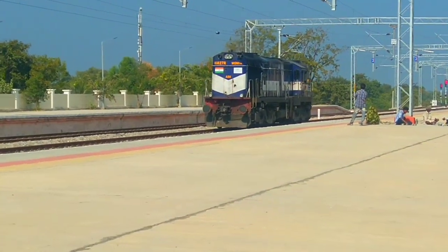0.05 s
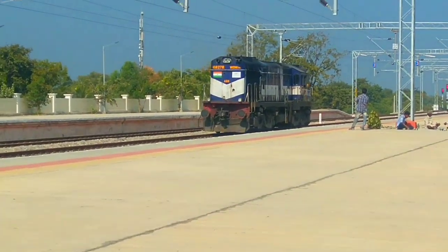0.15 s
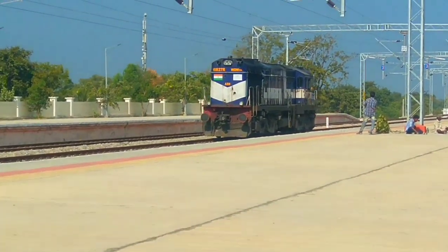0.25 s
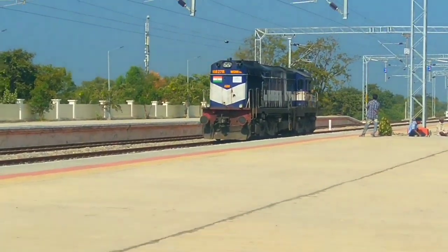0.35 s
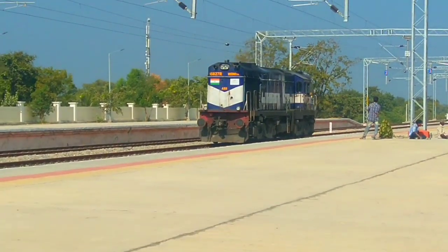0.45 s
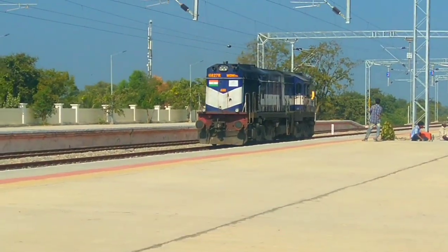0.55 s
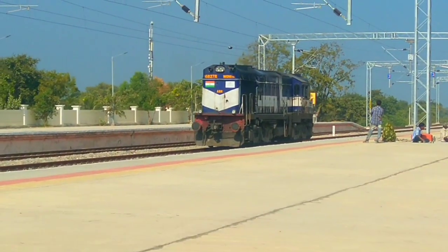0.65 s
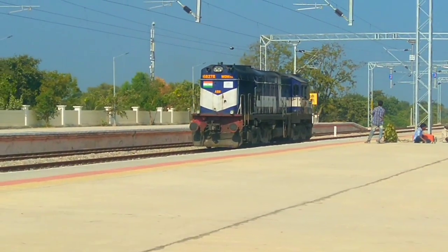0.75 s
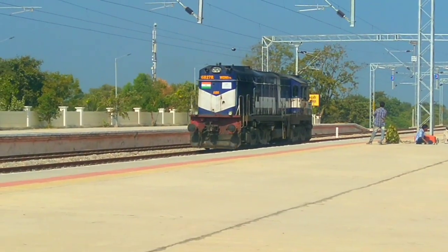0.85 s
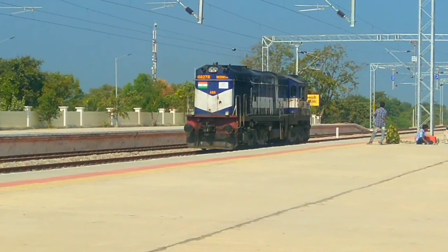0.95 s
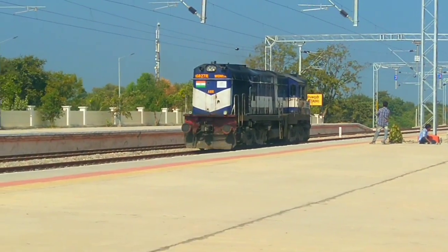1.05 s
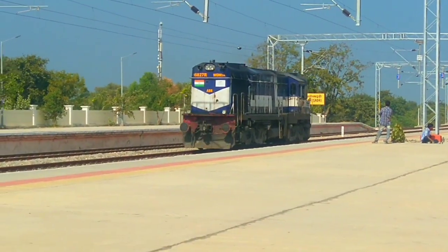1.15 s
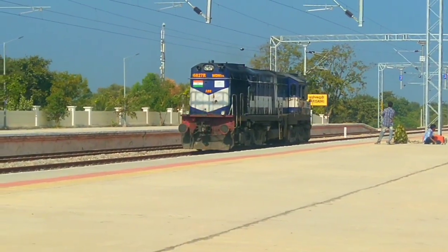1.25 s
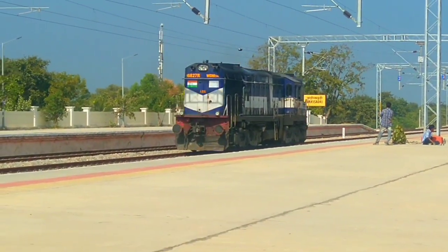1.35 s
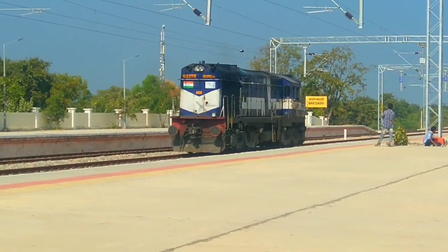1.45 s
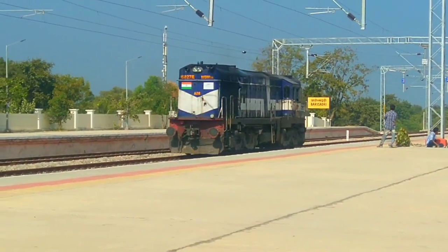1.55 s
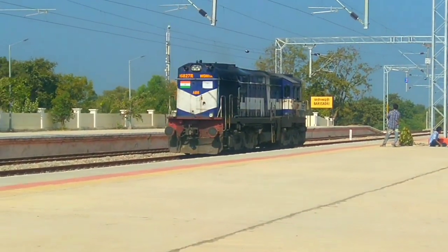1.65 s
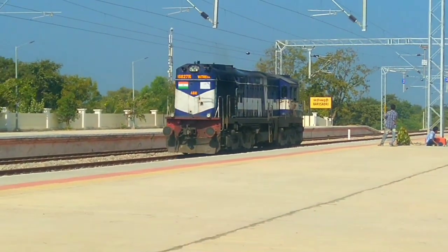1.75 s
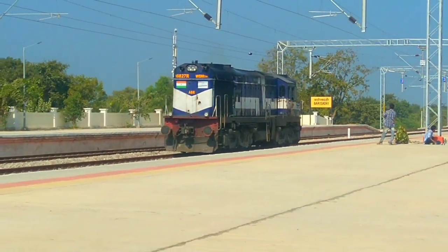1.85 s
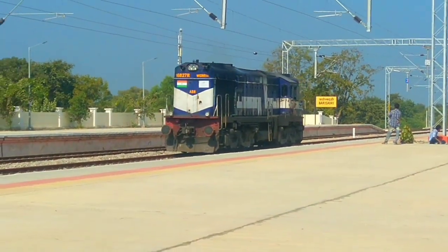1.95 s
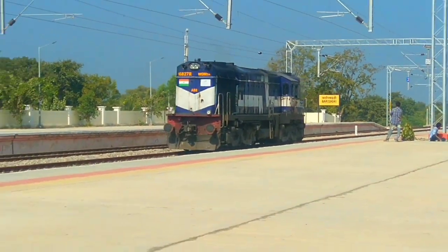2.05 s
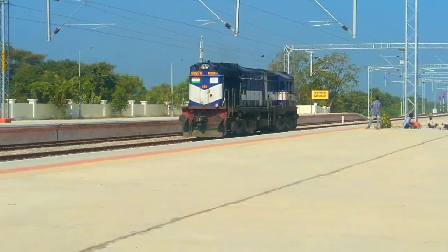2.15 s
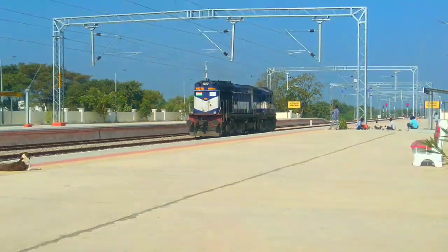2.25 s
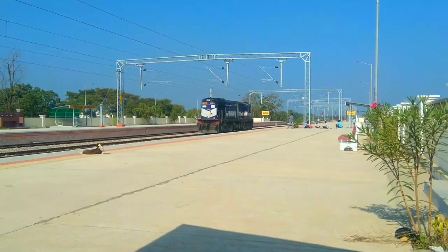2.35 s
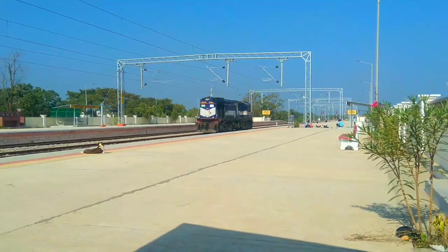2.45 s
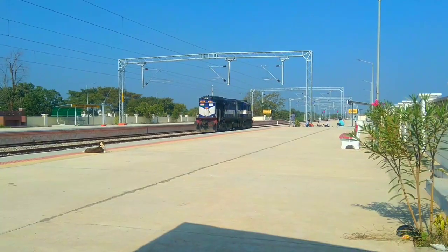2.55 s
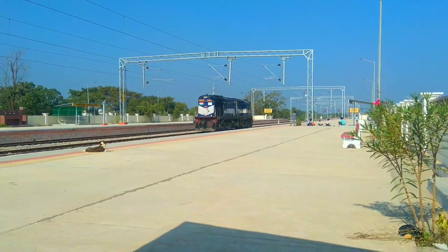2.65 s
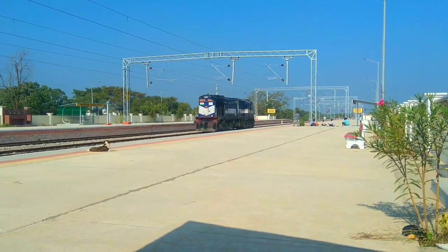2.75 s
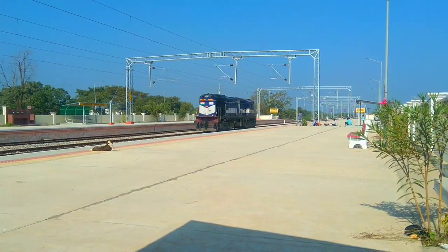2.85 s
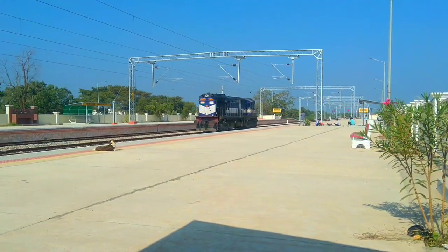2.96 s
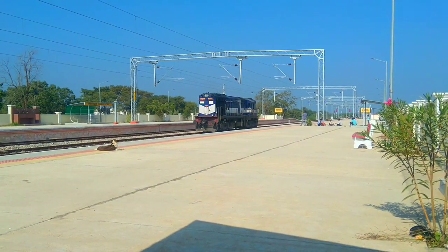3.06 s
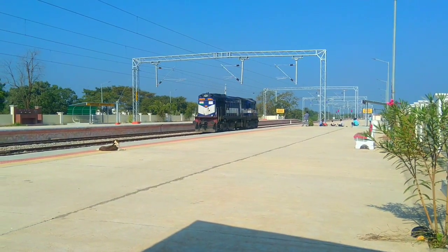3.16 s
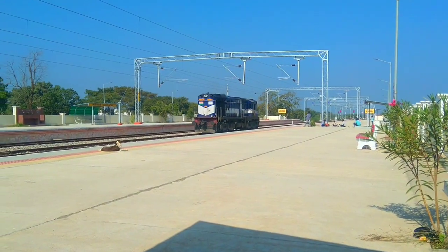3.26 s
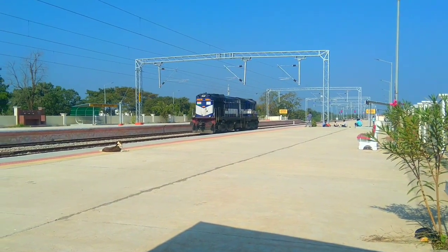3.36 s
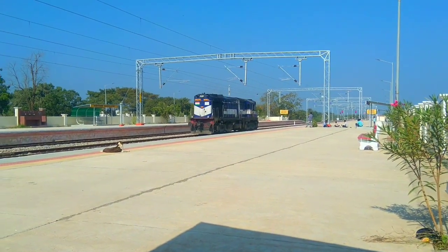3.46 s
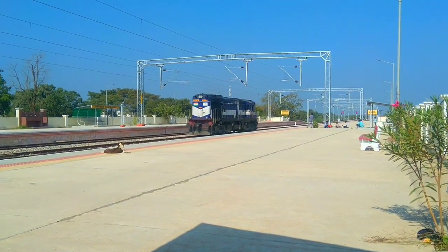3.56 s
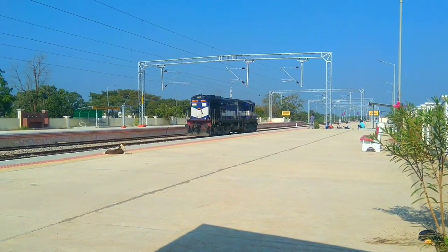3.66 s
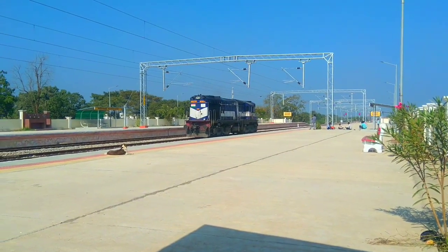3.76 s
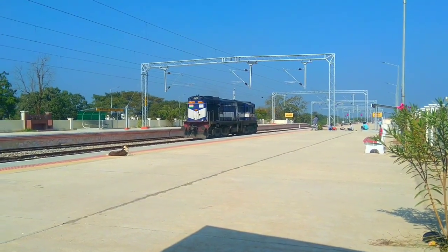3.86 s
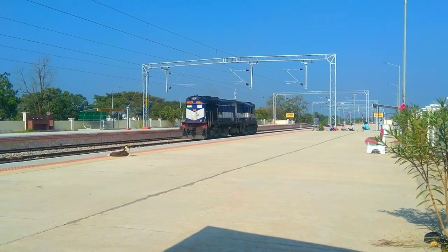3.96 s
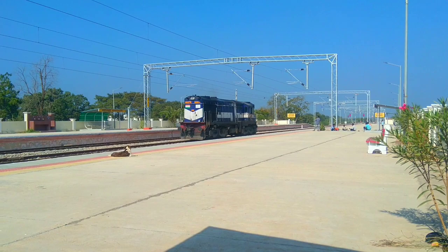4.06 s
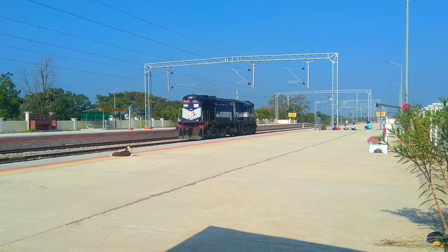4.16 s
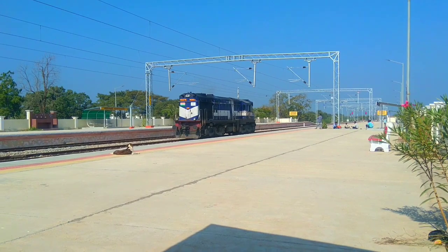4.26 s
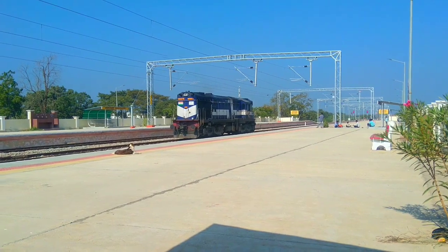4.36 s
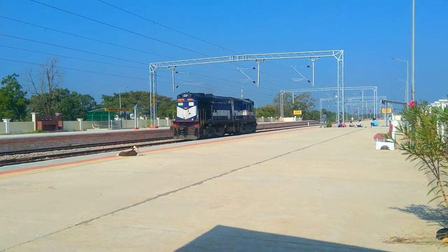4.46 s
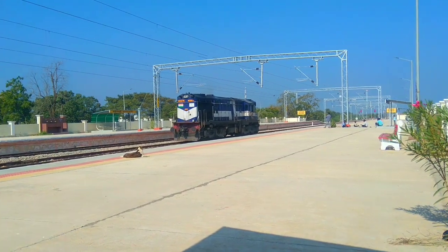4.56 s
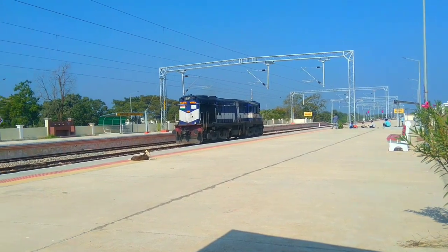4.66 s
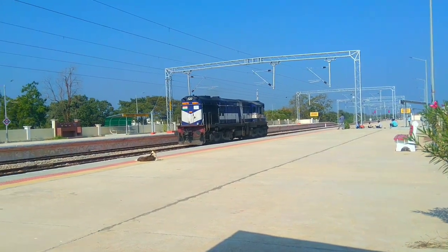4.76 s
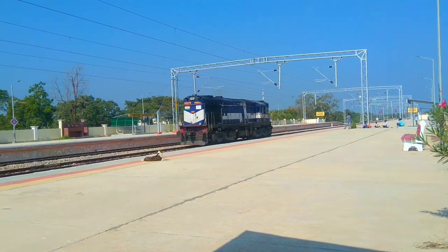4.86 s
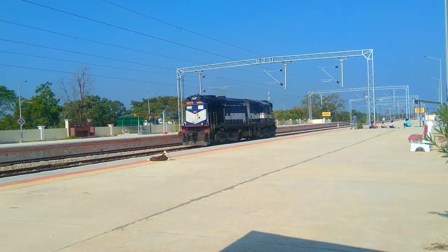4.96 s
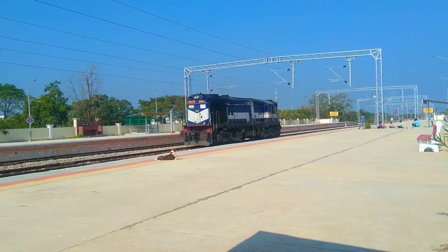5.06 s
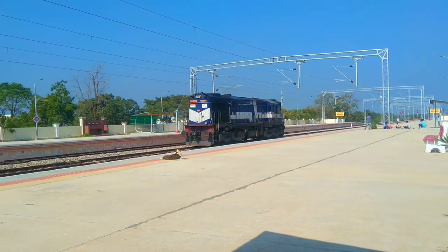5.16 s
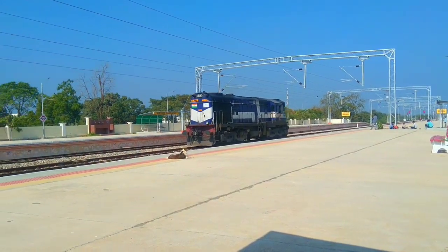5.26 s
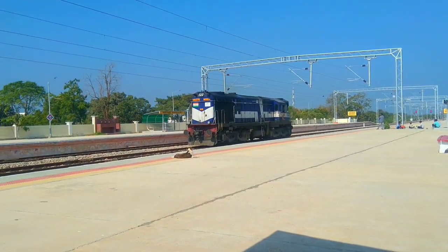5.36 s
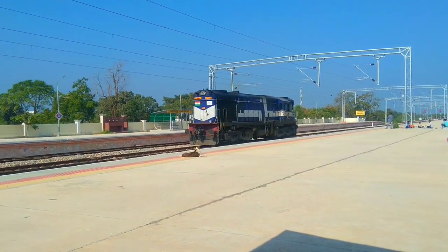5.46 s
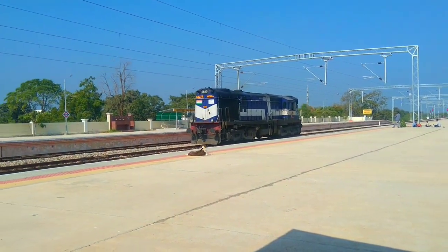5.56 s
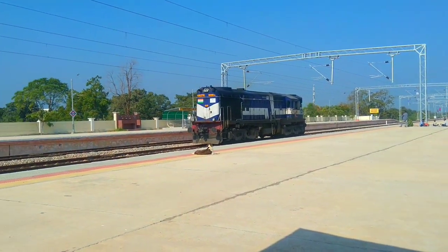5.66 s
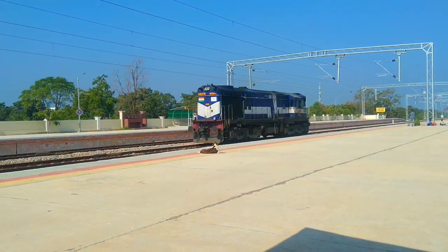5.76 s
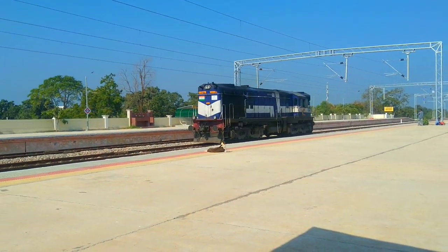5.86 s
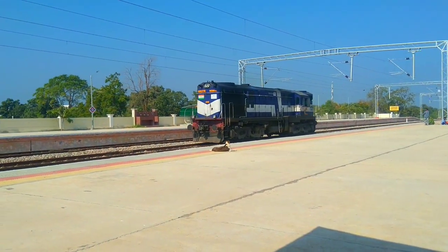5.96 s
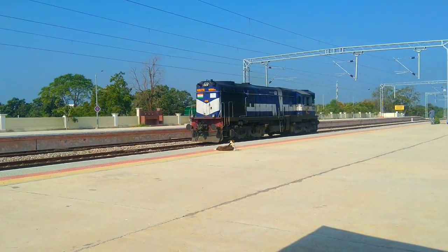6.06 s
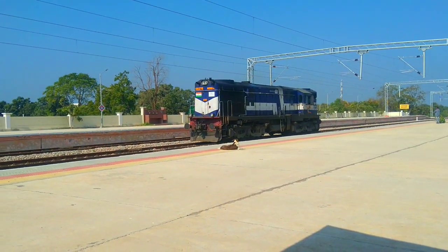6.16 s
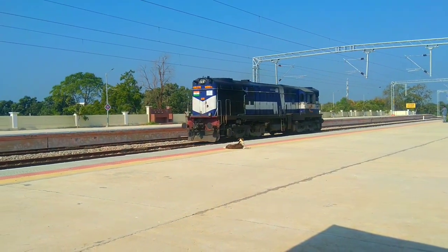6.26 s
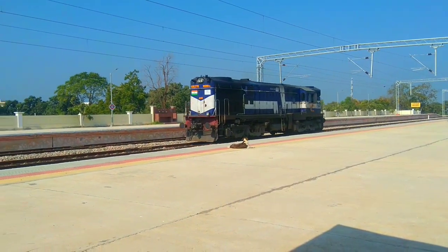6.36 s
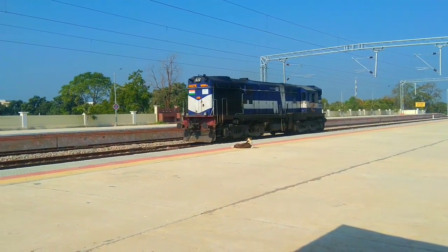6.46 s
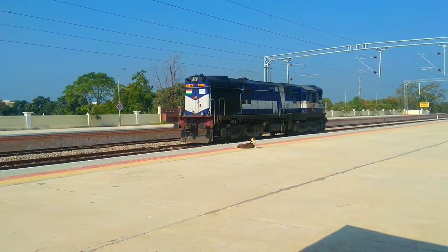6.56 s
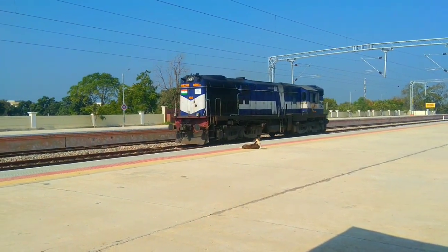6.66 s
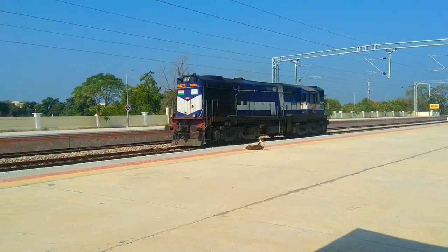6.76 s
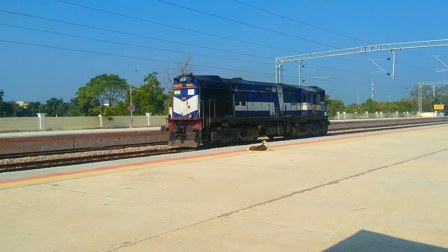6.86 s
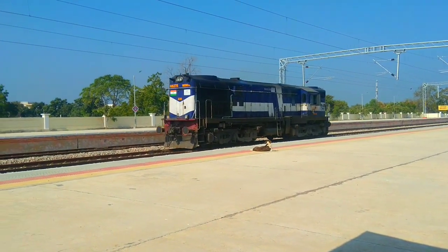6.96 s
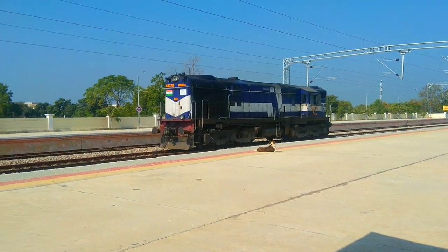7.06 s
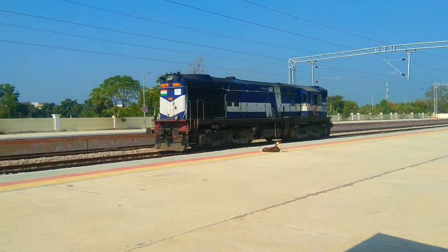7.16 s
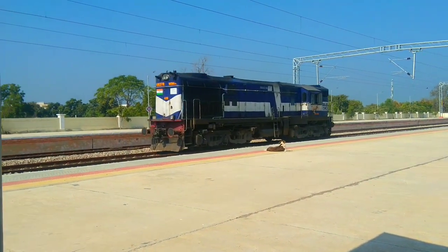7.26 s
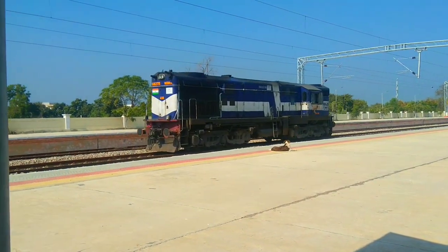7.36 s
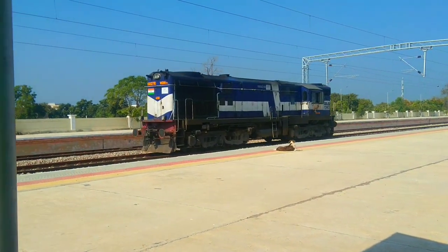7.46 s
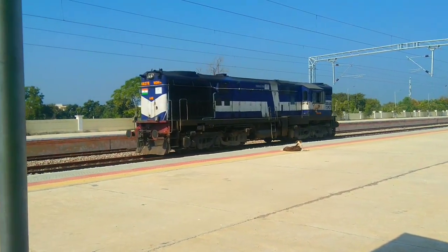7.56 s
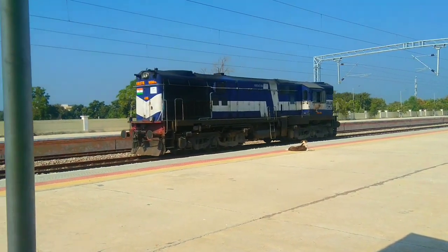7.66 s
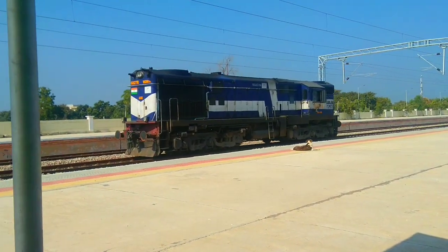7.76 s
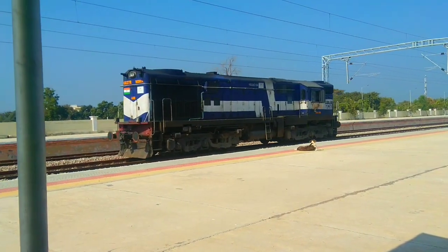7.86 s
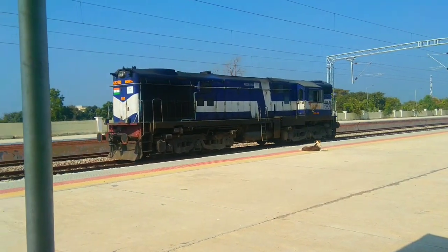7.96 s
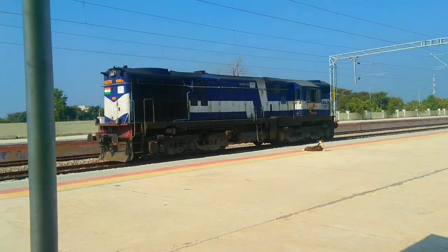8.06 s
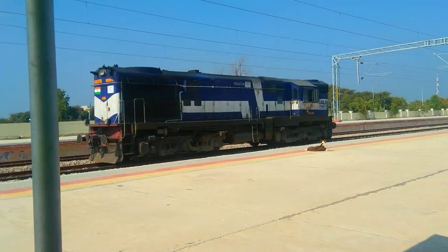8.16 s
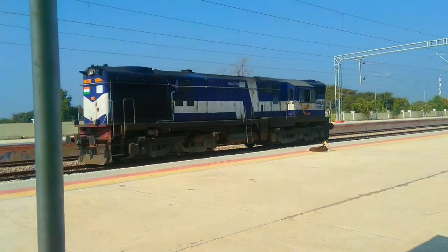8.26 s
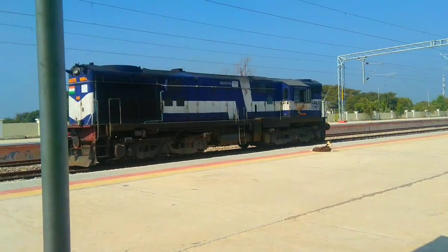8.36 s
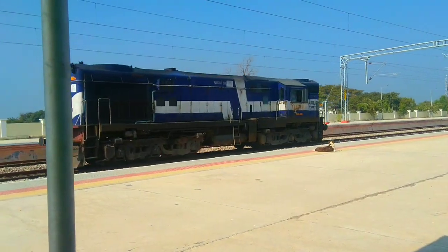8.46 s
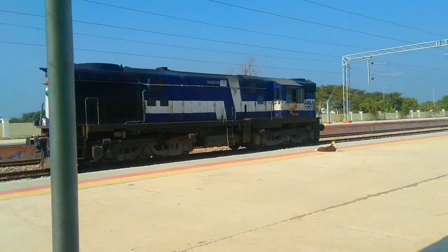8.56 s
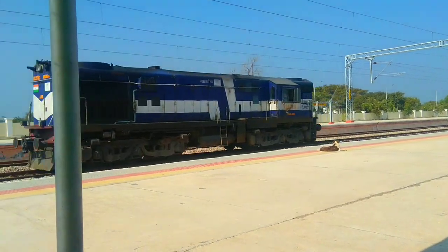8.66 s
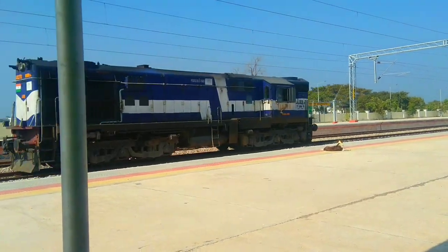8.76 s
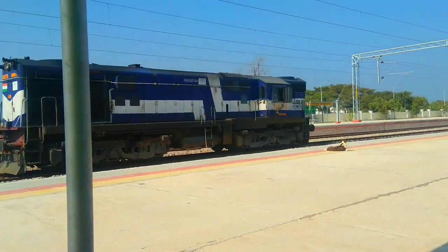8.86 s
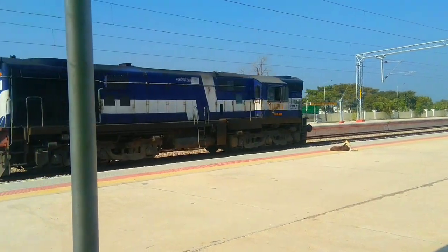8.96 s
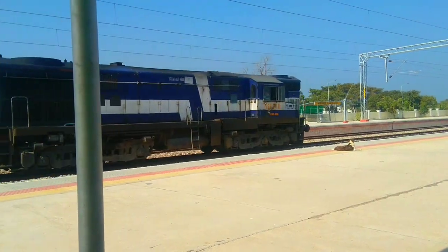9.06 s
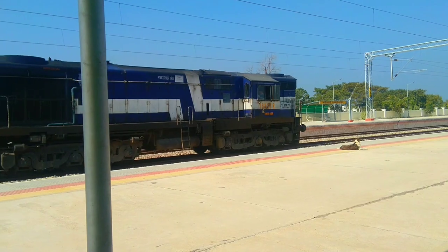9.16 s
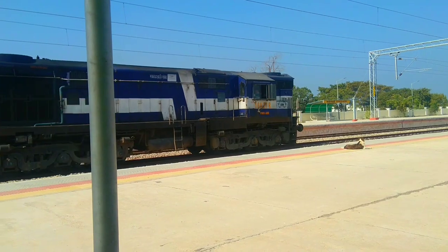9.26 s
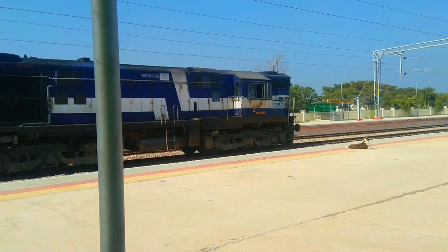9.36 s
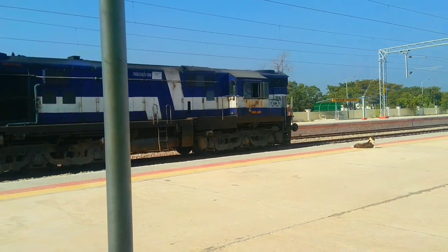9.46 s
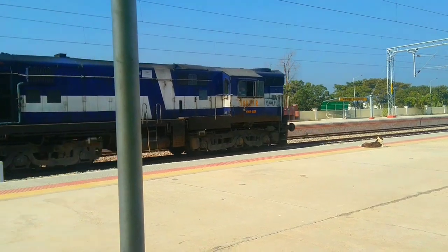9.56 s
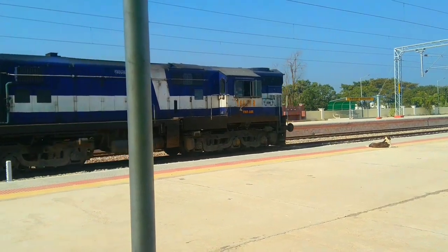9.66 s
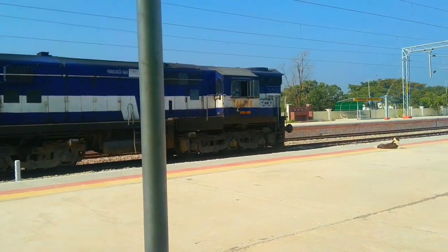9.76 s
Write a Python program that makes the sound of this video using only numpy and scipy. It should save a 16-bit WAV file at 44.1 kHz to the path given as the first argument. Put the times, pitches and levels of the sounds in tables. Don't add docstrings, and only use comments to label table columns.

```python
import sys
import numpy as np
from scipy import signal
from scipy.fft import rfft, irfft
from scipy.io import wavfile
from scipy.ndimage import uniform_filter1d

SR = 44100
rng = np.random.default_rng(int(sys.argv[2]) if len(sys.argv) > 2 else 0)


def wrap_up_sound(samples):
    columns = np.atleast_2d(samples).T
    tamed = np.clip(columns, -1, 1)
    steps = np.round(tamed * 32767).astype(np.int16)
    wavfile.write(sys.argv[1], SR, steps)


def volts_from_db(level):
    exponent = np.asarray(level, float) / 20
    return 10 ** exponent


N = 433062
TIME = np.arange(N) / SR
HZ = np.fft.rfftfreq(N, 1 / SR) + 1e-3

# frequency in Hz, width in Hz, level in dB, throb per engine cycle in dB,
# its phase in turns, throb per crank turn in dB, its phase in turns.
RUMBLE_MODES = [(53.6, 22.8, 1.7, 0, 0.56, 0, 0.66), (76.9, 20.6, 2.5, 0.5, 0.41, 0, 0.37)]
THUD_MODES = [(95, 19.1, -0.55, 7.1, 0.4, 4.3, 0.3723), (119.3, 16.7, 0.15, 4.4, 0.57, 3.5, 0.72)]
BOOM_MODES = [(190, 32.1, -1.5, 0.31, 0.22, 6.8, 0.44), (186.5, 15.23, -1, 0.57, 0.44, 4, 0.34)]
BARK_MODES = [(250.8, 28.6, 1.5, 1.4, 0.8, 1.8, 0.26), (290.1, 22.38, 1.8, 0.75, 0.85, 2.9, 0.087),
              (366.2, 24.1, 0.7, 0.35, 0.21, 2.7, 0.46), (414.6, 38.6, -9.5, 4.5, 0.57, 2, 0.88)]
DRONE_MODES = [(164.8, 40.3, 0, 1.3, 0.32, 3.2, 0.072)]
EXHAUST_GROUPS = (RUMBLE_MODES, THUD_MODES, BOOM_MODES, BARK_MODES, DRONE_MODES)
# mean in dB, share of the machinery swing, share of the stack swing,
# rise when abreast in dB, time abreast in seconds.
EXHAUST_GROUP_LEVELS = [
    (-22, 0.31, -0.18, 0.5, 10),
    (-22, 0.19, -0.067, 9.5, 9.17),
    (-18, .02, 0.81, 1.26, 9.5),
    (-23.5, 0.65, 0.081, 5, 8.74),
    (-18, .02, 1.18, -2, 10.27),
]
# frequency in Hz, level in dB per Hz.
AIR_HISS = [(1710, -28), (2900, -5), (3670, 2.5), (3950, 0.5), (4260, -2), (4810, -6), (5250, -1.5),
            (5760, -10), (8290, -14), (12500, -42), (14500, -67)]
# start in seconds, peak in dB, frequency in Hz.
ROD_CLINKS = [(.236, -23, 704), (.594, -31, 3220), (.6504, -31, 2510), (.872, -33, 4750),
              (1.1373, -29, 3070), (1.225, -36, 5500), (1.494, -34, 5100), (2.9527, -18.5, 1900),
              (3.1727, -30, 2150), (3.2525, -20, 2230), (3.3408, -20, 2470), (3.4162, -13.5, 2140),
              (3.5573, -19, 2076), (3.705, -10, 2333), (3.9145, -23, 2138), (3.9664, -14.5, 2110),
              (4.0323, -24, 2110), (4.1834, -24, 2410), (4.3256, -28, 2170), (4.4024, -20, 2105),
              (4.5032, -22, 2100), (4.6778, -24, 2065), (4.8135, -29, 2150), (4.9666, -15.5, 2140),
              (5.0624, -20, 2170), (5.248, -13.5, 2040), (5.3228, -18, 2180), (5.5189, -15, 2136),
              (5.8347, -28, 1960), (3.05, -22, 2130), (3.33, -27, 2470), (3.872, -20, 2530),
              (3.865, -19, 2200), (3.92, -25, 2540), (4.06, -20, 2370), (4.14, -25, 2550),
              (4.265, -21, 2380), (4.42, -22, 2380)]


def rms_one(x):
    return x / np.sqrt(np.mean(x ** 2) + 1e-20)


def in_time(rows):
    s, *columns = np.transpose(rows)
    return [np.interp(TIME, s, column) for column in columns]


def at_hz(points):
    hz, values = np.array(points)[:, :2].T
    return np.interp(np.log(HZ), np.log(hz), values)


def drift(rate):
    r = np.exp(-80 * np.pi * rate / SR)
    slow = signal.lfilter([1], [1, -2 * r, r * r], rng.standard_normal(N // 40 + 2002))[2000:]
    return np.interp(np.arange(N) / 40, np.arange(len(slow)), rms_one(slow))


def patches(shape, bins, frames):
    field = uniform_filter1d(rng.standard_normal(shape), size=bins, axis=0)
    return rms_one(uniform_filter1d(field, size=frames, axis=1))


def two_ports(mid):
    # frequency in Hz, likeness of left and right from 0 to 1.
    likeness = [(60, .995), (190, .99), (290, .95), (600, .86), (800, .76), (1400, .44), (2100, .55),
                (3100, .33), (6800, .42), (15000, .5)]
    # frequency in Hz, left over right in dB.
    left_over_right = [(60, -2.5), (110, -2.5), (200, -2), (380, -2.5), (700, -3), (1290, -3.0),
                       (2380, -9.5), (4400, -2), (8120, 6.5), (15000, -1.5)]
    # frequency in Hz, phase by which the left port leads in radians.
    left_lead = [(0, 0), (400, 0), (1400, 0), (2150, .5), (3790, .6), (5000, 2.5), (5680, .8), (8180, 4.7),
                 (11700, 16), (15000, 27)]
    alike = np.clip(at_hz(likeness), 0, 1)
    same = np.sqrt(1 + alike) * rfft(mid)
    other = np.sqrt(1 - alike) * rfft(rng.standard_normal(N))
    tilt = volts_from_db(at_hz(left_over_right) / 2) * np.exp(.5j * np.interp(HZ, *np.transpose(left_lead)))
    return np.array([(same + other) * tilt, (same - other) / tilt])


def coloured(spectrum):
    inside = (HZ > spectrum[0][0]) & (HZ < spectrum[-1][0])
    return rms_one(irfft(two_ports(rng.standard_normal(N)) * volts_from_db(at_hz(spectrum)) * inside, N))


def resonance(x, hz, width_hz):
    r = np.exp(-np.pi * width_hz / SR)
    b = [1 - r * r, 0, r * r - 1]
    a = [1, -2 * r * np.cos(2 * np.pi * hz / SR), r * r]
    return signal.lfilter(b, a, signal.lfilter(b, a, x / 4))


def levels_db(rows):
    # time in seconds, level over its mean in dB.
    machinery_swing = [(0, -15.5), (.42, -16.5), (.58, -10), (.76, -5), (1.12, -5.5), (1.56, -8.5),
                       (2.0, -8.5), (2.4, -5), (2.82, -3.5), (3.14, 1), (3.35, 0.8), (4.4, -0.6), (5.66, 2),
                       (7.0, 2.5), (8.3, 3.5), (8.97, 5), (9.3, 2.5), (9.82, 4)]
    stack_swing = [(0, -8.5), (.2, -7), (.38, -1.5), (.56, -5), (1.2, -4), (1.62, -9.5), (1.82, -5),
                   (2.62, -6), (2.85, -4), (4.4, -5), (5.0, -2.5), (5.6, -1), (6.5, 1.5), (6.63, 5),
                   (8.0, 6), (8.95, 8), (9.2, 9), (9.82, 10.5)]
    (machinery,), (stack,) = in_time(machinery_swing), in_time(stack_swing)
    pass_s = 1.21
    levels = []
    for db, machinery_share, stack_share, rise_db, s in rows:
        abreast_db = rise_db / (1 + ((TIME - s) / pass_s) ** 4)
        levels.append(db + machinery_share * machinery + stack_share * stack + abreast_db)
    return levels


def engine_cycle():
    # time in seconds, lead in cycles.
    cycle_lead = [(0, 0.12), (.8, 0.0038), (1.8, 0.084), (3.8, 0.09), (4.8, 0.075), (5.8, 0.19), (6.8, .26),
                  (7.8, 0.33), (8.8, 0.44), (9.8, 0.39)]
    cycles_per_s = 3.63
    return cycles_per_s * TIME + in_time(cycle_lead)[0]


def throb_db(cycle, cycle_db, cycle_turn, crank_db, crank_turn):
    per_cycle = cycle_db * np.cos(2 * np.pi * (cycle + cycle_turn))
    return per_cycle + crank_db * np.cos(2 * np.pi * (2 * cycle + crank_turn))


def firing(cycle, uneven_db, jitter, rough):
    count = np.arange(int(16 * cycle[-1]))
    beat = count + jitter * rng.standard_normal(len(count))
    at = np.interp(beat, 16 * cycle, np.arange(N)).astype(int)
    cylinder_db = uneven_db * rng.standard_normal(8)
    pulses = np.zeros(N)
    pulses[at] = volts_from_db(cylinder_db[count % 8] + 2.0 * rng.standard_normal(len(count)))
    rough = np.clip(rough, 0, 1)
    turbulence = np.sqrt(rough) * rng.standard_normal(N)
    return np.sqrt(1 - rough) * rms_one(pulses - pulses.mean()) + turbulence


def evened(x, hz, share):
    power = uniform_filter1d(x.mean(axis=0) ** 2, size=int(2 * SR / hz))
    return rms_one(x * (power / power.mean() + 0.098) ** (-np.clip(share, 0, 1) / 2))


def exhaust(cycle):
    surge_db, surges_per_s = 0.8, 3.3
    even_shares = (0.44, 0.54, 0.8, 0.51, 0.99)
    gas = irfft(two_ports(firing(cycle, uneven_db=8.0, jitter=0.071, rough=0.84)), N)
    out = 0
    for modes, level_db, share in zip(EXHAUST_GROUPS, levels_db(EXHAUST_GROUP_LEVELS), even_shares):
        group = 0
        for hz, width, db, *throb in modes:
            ringing = evened(resonance(gas, hz, width), hz, share)
            group = group + volts_from_db(db + throb_db(cycle, *throb)) * ringing
        out = out + volts_from_db(level_db + surge_db * drift(surges_per_s)) * rms_one(group)
    return out


def chugs(cycle):
    clean_db = (-9, -6, -3.5, -5.5, -9.5)
    scatter_s, scatter_db, narrowing = .0012, 2, .7
    out = 0
    for modes, level_db, chug_db in zip(EXHAUST_GROUPS, levels_db(EXHAUST_GROUP_LEVELS), clean_db):
        group = 0
        chance = rng.standard_normal((2, 90))
        for hz, width, db, *throb in modes:
            swing_db = throb_db(cycle[::40], *throb)
            crest = signal.argrelmax(swing_db)[0][:90]
            early, strength = chance[:, :len(crest)]
            build_s = 1 / (np.pi * narrowing * width)
            at = crest * 40 - SR * (build_s + scatter_s * early)
            kicks = np.full(N, 1e-18)
            kicks[np.clip(at, 0, N - 1).astype(int)] = volts_from_db(swing_db[crest] + scatter_db * strength)
            group = group + volts_from_db(db) * rms_one(resonance(kicks, hz, narrowing * width))
        out = out + volts_from_db(level_db + chug_db) * rms_one(group)
    return out * volts_from_db(np.array([[-1.0], [1.0]]))


def shimmer(x, depth_db):
    hz, _, cells = signal.stft(x, SR, nperseg=1024)
    depth = np.interp(hz, *np.transpose(depth_db))[:, None]
    swing_db = depth * patches(cells.shape[1:], bins=2, frames=45)
    gain = volts_from_db(swing_db - depth ** 2 * np.log(10) / 20)
    return signal.istft(cells * gain, SR, nperseg=1024)[1][:, :N]


def engine_room(cycle):
    # frequency in Hz, level in dB per Hz.
    block = [(240, -21.5), (400, -1), (492, -5.5), (576, -1), (762, -2), (912, -7.5), (1000, -8),
             (1300, -68), (2200, -120)]
    casing_near = [(530, -10.5), (900, -25), (936, -7.5), (1090, 4), (1310, 1.5), (1630, -5), (1750, -32),
                   (2280, -31), (3850, -120)]
    casing_far = [(530, -30), (900, -0.5), (1090, -5.5), (1360, 3.5), (1460, 0), (1520, -6), (1750, -15),
                  (2280, -35), (3850, -120)]
    gear = [(940, -8.5), (1600, -6.5), (1840, -2), (2100, -3), (2820, -7), (3200, -10), (4160, -54),
            (7040, -120)]
    hiss_far = [(1710, -37), (2900, -28), (3210, 4), (3450, -29), (3770, -35), (4300, -29), (4790, -1.5),
                (5360, -9), (6330, -10.5), (6730, -28), (7700, -19), (8800, -18.5), (11000, -47),
                (14300, -83), (22000, -120)]
    hiss_near = [(1710, -38), (2900, -5.5), (3760, -7.5), (4390, -7), (7700, -15.5), (8320, -20.5),
                 (8990, -23), (9710, -15.5), (10500, -26), (13000, -24.5), (14000, -30), (15600, -47)]
    # frequency in Hz, width in Hz, level over the hiss in dB.
    whines = [(8160, 130, -13.5), (9500, 180, -18.5), (12500, 200, -37), (11300, 150, -24.5),
              (1096, 143, 2.5)]
    # time in seconds, share of far colour, share of near colour.
    approach = [(0, 0.78, .01), (.15, 0.95, .01), (.48, 0.98, 0.0085), (.62, 0.52, .01), (1.5, 0.4, .01),
                (1.95, 0.73, .01), (2.3, 0.066, 0.011), (3.0, 0.034, 0.019), (4.6, 0.027, 0.26),
                (6.5, .01, 0.38), (8.2, 0.03, 0.73), (9.82, 0.012, 0.89)]
    # mean in dB, share of machinery swing, share of stack swing, rise abreast in dB,
    # time abreast in seconds.
    roar_levels = [
        (-26, 0.42, .02, 5, 10.96),
        (-32.5, 0.34, 0.23, 5, 8.38),
        (-31.5, 0.62, 0.081, 1.5, 7.85),
        (-33.5, 0.94, .01, 1.2, 9),
    ]
    levels, together = levels_db(roar_levels), drift(28.0)
    far, near = np.clip(in_time(approach), 0, 1)
    casing = np.sqrt(far) * coloured(casing_far) + np.sqrt(1 - far) * coloured(casing_near)
    closer = np.sqrt(1 - near) * coloured(AIR_HISS) + np.sqrt(near) * coloured(hiss_near)
    hiss = np.sqrt(far) * coloured(hiss_far) + np.sqrt(1 - far) * closer
    layers = (coloured(block), casing, coloured(gear), hiss)
    beat_db = throb_db(cycle, 0.39, 0.7, 0.19, 0.82)
    out = 0
    for noise, level_db, shared_db in zip(layers, levels, (.4, .6, .8, .9)):
        out = out + volts_from_db(level_db + beat_db + shared_db * together + 0.73 * drift(25.0)) * noise
    out = shimmer(out, depth_db=[(300, 0.97), (900, 1.1), (1500, 1.9), (4000, 1.2), (5500, 2.9),
                                 (8000, 3.3), (13000, 3.6)])
    white = irfft(two_ports(rng.standard_normal(N)), N)
    for hz, width, db in whines:
        whine = rms_one(resonance(white, hz, width))
        out = out + near * volts_from_db(levels[3] + db + drift(0.98)) * whine
    return out


def whistle():
    # time in seconds, frequency in Hz, level in dB.
    mesh_tone = [(0, 1970, -42.5), (.33, 1880, -43), (.55, 2040, -34), (.83, 1980, -36), (.96, 2090, -37),
                 (1.18, 1940, -38), (1.8, 2030, -40), (2.84, 2040, -47), (2.98, 2074, -33),
                 (3.4, 2168, -35), (3.72, 2247, -27), (3.9, 2185, -35.5), (5.5, 2084, -33),
                 (5.65, 2008, -31), (6.6, 1980, -37.5), (8.55, 2048, -39), (8.8, 2070, -32.5),
                 (9.82, 2043, -33)]
    # time in seconds, clean share from 0 to 1.
    clean_share = [(0, .65), (2.3, .65), (2.9, .1), (9.82, .1)]
    flicker_db, kick_db, kick_s = 1.5, 1.5, .03
    hz, level_db = in_time(mesh_tone)
    kicks = sum(volts_from_db(db + 10) * np.exp(-((TIME - s) / kick_s) ** 2) for s, db, _ in ROD_CLINKS)
    level_db = level_db + kick_db * kicks + flicker_db * drift(14.0) - 2.5
    turn = 2 * np.pi * np.cumsum(hz + 25.0 * drift(12.09)) / SR
    clean, = in_time(clean_share)
    rough = np.sqrt(1 - clean ** 2 / 2)

    def band():
        in_phase = (clean + rough * drift(100)) * np.cos(turn)
        return in_phase + rough * drift(100) * np.sin(turn)

    left, right = band(), band()
    ports = np.array([volts_from_db(-3.0) * (0.18 * right + 2.33 * left), volts_from_db(8.0) * right])
    return volts_from_db(level_db - 4.0) * ports


def compressor():
    # start in seconds, peak in dB, length in seconds.
    puffs = [(0.58, -25, 0.025), (0.665, -21, 0.043), (0.865, -21, 0.019), (0.935, -22.5, 0.043),
             (1.134, -22.5, 0.017), (1.219, -22.5, 0.028), (1.488, -27.5, 0.039), (3.063, -19, 0.025),
             (3.157, -15.5, 0.031), (3.343, -23, 0.025), (3.414, -17.5, 0.07), (3.613, -18.5, 0.02),
             (3.689, -16, 0.043), (3.87, -27, 0.028), (3.969, -21, 0.028), (4.416, -26, 0.023),
             (4.7, -34, 0.036), (4.98, -25, 0.025), (5.05, -25, 0.024), (5.243, -32, 0.021),
             (5.52, -26, 0.029), (6.53, -18.5, 0.037), (9.283, -19, 0.025), (9.415, -27, 0.024)]
    # frequency in Hz, level in dB per Hz.
    puff_spectrum = [(590, -49), (1000, -10.5), (1640, -6), (1900, -32), (1970, -18), (2360, -10),
                     (2520, -10.5), (8280, -22.5), (13000, -49)]
    envelope = np.zeros(N)
    for s, db, length in puffs:
        start = int(s * SR)
        t = np.maximum(TIME[start:start + SR // 4] - s, 0)
        rise = 1 - np.exp(-t / 0.0037)
        envelope[start:start + len(t)] += volts_from_db(db - 4.0) * rise * np.exp(-t / max(length, .003))
    return envelope * coloured(puff_spectrum)


def clinks():
    out, t = np.zeros(N), np.arange(SR // 8) / SR
    for s, db, hz in ROD_CLINKS:
        start = int(s * SR)
        ring = np.sin(2 * np.pi * hz * t) + 0.27 * np.sin(2 * np.pi * 1.2 * hz * t)
        decay = volts_from_db(db - 1.5 - 60 * t / 0.098)
        out[start:start + len(t)] += decay * (1 - np.exp(-t / 0.0024)) * ring
    return out * volts_from_db(np.array([[-3.0], [2.5]]))


def blow_off():
    # frequency in Hz, level in dB per Hz.
    blast_low = [(410, -33), (700, -5), (860, -4.5), (1030, -11), (1270, 3), (1380, -5), (1840, -9),
                 (2790, 1), (3600, -16), (4680, -38), (7920, -120)]
    blast_high = [(2000, -35), (3400, -6.5), (4060, -3.5), (4850, -7), (6260, -5), (8660, -8.5),
                  (12900, -24.5), (15300, -37.5), (15600, -49)]
    # peak in dB, sag while open in dB per second, ringing on below it in dB,
    # decay of that ringing in dB per second.
    parts = [
        (-14.5, 60, -9.5, 50),
        (-12, 62, -10, 100),
    ]
    opens_s, shuts_s, attack_s, release_s = 2.027, 2.215, 0.0089, 0.0083
    echo_s, echo_db, echo_rise_s, echo_decay_db_per_s = 0.14, -21, .05, 64
    since, shut = np.maximum(TIME - opens_s, 0), np.maximum(TIME - shuts_s, 0)
    out = 0
    for spectrum, (db, sag_db, ring_db, decay_db) in zip((blast_low, blast_high), parts):
        ringing_on = volts_from_db(ring_db - decay_db * shut)
        closing = np.exp(-shut / release_s) * (1 - volts_from_db(ring_db)) + ringing_on
        out = out + volts_from_db(db - sag_db * (since - shut)) * closing * coloured(spectrum)
    late = np.maximum(since - echo_s, 0)
    echo_rise = 1 - np.exp(-(late / echo_rise_s) ** 2)
    echo = volts_from_db(echo_db - echo_decay_db_per_s * late) * echo_rise * coloured(AIR_HISS)
    opening = 1 - np.exp(-(since / attack_s) ** 2)
    return volts_from_db(1.3 * drift(40.0)) * opening * out + echo


def leaks():
    # start in seconds, length in seconds, level in dB.
    escapes = [
        (8.2, .32, -50),
        (9.25, 0.55, -49),
    ]
    # frequency in Hz, level in dB per Hz.
    leak_spectrum = [(13300, -26), (13900, -4), (14800, -2), (15600, -8)]
    gate = 0
    for s, length, db in escapes:
        gate = gate + volts_from_db(db) * np.clip(np.minimum(TIME - s, s + length - TIME) / .03, 0, 1)
    return gate * volts_from_db(3.0 * drift(9.0)) * coloured(leak_spectrum)


def swelling(x, swells, width_hz):
    hz, s, cells = signal.stft(x, SR, nperseg=8192, noverlap=6144)
    low = hz[:900, None]
    gain_db = 0
    for at, half_s, centre, glide, db in swells:
        off_centre = (low - centre - glide * (s - at)) / width_hz
        gain_db = gain_db + db * np.exp(-((s - at) / half_s) ** 2 - off_centre ** 2)
    cells = np.concatenate([cells[:, :900] * volts_from_db(gain_db), cells[:, 900:]], axis=1)
    return signal.istft(cells, SR, nperseg=8192, noverlap=6144)[1][:, :N]


def turning(x):
    # time in seconds, left port's bass delay in ms, its shading near 3.7 kHz in dB.
    bearing = [(0, .01, -6), (1.5, .02, -6), (3, .09, -4), (5, .13, -1), (7, .17, 0), (8.3, .13, 0),
               (9.82, .05, 0)]
    hz, s, cells = signal.stft(x[0], SR, nperseg=2048)
    at, late_ms, shade_db = np.transpose(bearing)
    turn = 2 * np.pi * hz * np.interp(hz, [1300, 1900], [1, 0]) / 1000
    shade = np.exp(-((hz - 3700) / 800) ** 2)
    delay = np.exp(-1j * np.outer(turn, np.interp(s, at, late_ms)))
    cells = cells * delay * volts_from_db(np.outer(shade, np.interp(s, at, shade_db)))
    return np.array([signal.istft(cells, SR, nperseg=2048)[1][:N], x[1]])


def scene():
    # time in seconds, half length in seconds,
    # frequency in Hz, glide in Hz per second, gain in dB.
    low_swells = [(1.36, 0.44, 55, 1, 5.5), (3.3, 0.37, 54, 0, 3), (2.6, .25, 84, 0, -4),
                  (4.5, 0.37, 55, 0, -8), (4, .6, 72, -8, 4), (8.54, 0.77, 113, -7, 1.5),
                  (7.66, 0.65, 135, -13, 7), (1.1, .4, 100, 0, 1), (5.06, .6, 174, -1, 4.5),
                  (5.74, 0.44, 192, -5, -4), (5.2, .3, 269, 0, 2), (7.5, 0.53, 186, -2, 3),
                  (8.16, 0.2, 175, 2, 0.5), (8.34, 0.7, 197, -3, -4), (9.22, 0.42, 204, -7, 5.5),
                  (6.7, 0.55, 270, 0, 3), (1.7, 0.28, 227, -1, 6), (1.94, 0.38, 287, -7, 5.5),
                  (5.12, 0.48, 285, 1, 5.5), (6.7, .4, 289, -5, -7), (7.95, .4, 298, 1, 7),
                  (8.76, 0.37, 272, -9, 5.5), (2.3, 1.7, 368, -1, -7.5), (.4, 0.47, 245, 10, -3),
                  (3.5, 0.57, 470, 1, -2), (6.35, 0.98, 348, -4, 4.5), (4.36, .35, 295, 1, 5.5),
                  (8.09, 0.44, 365, 1, -10), (8.29, 0.34, 360, -1, 5), (9.13, 0.43, 370, -1, 5.5),
                  (9.5, 0.46, 326, 0, 4.5), (0.93, 2.1, 210, -5.5, -8), (7.4, 1.8, 230, 1, -5.5)]
    middle_swells = [(0.95, 0.73, 604, -1, 7), (0.89, .4, 1000, -2, 1.5), (0.85, .4, 835, 2, 5),
                     (.3, .4, 1120, -2, 7), (1.8, .4, 910, 0, 3), (2.4, 0.87, 1010, -31, -11),
                     (2.63, 0.22, 636, 0, -13), (2.87, .4, 820, 0, 2.5), (3.6, 0.43, 830, 29, 5.5),
                     (3.72, 0.53, 600, -20, 6), (3.8, .4, 1250, 0, 5), (4.4, 0.32, 920, -2, 6.5),
                     (5.15, 0.44, 512, 0, 8.5), (5.5, 0.64, 786, -43, 3.5), (5.4, 0.51, 1245, 0, 5),
                     (5.22, .4, 1120, -37, 5.5), (5.95, .5, 1090, 2, 7.5), (6.3, .7, 990, 0, 1.5),
                     (6.42, 0.6, 497, 4, 5.5), (5.55, 0.98, 713, -3, -2.5), (6.8, 1.3, 900, -7, -5.5),
                     (7, 1.2, 1170, -1, 6.5), (7.46, .4, 1085, -31, 5.5), (9.3, .5, 1120, -29, 3),
                     (9.17, 0.68, 1045, 1, 7), (9.1, 0.34, 800, 2, 8), (7.64, .3, 734, -3, 0.5),
                     (8.3, 0.78, 594, 1, 3)]
    upper_swells = [(1.2, .4, 1600, 0, -3), (.1, 0.33, 2480, -2, 4), (.2, .4, 3130, 0, -9),
                    (.6, .7, 3950, 100, 7), (1.2, .6, 1600, 1, 6.5), (1.0, .6, 4000, 1, 1),
                    (1.8, .35, 2380, 0, 5.5), (2.1, .4, 3400, 2, 0.5), (2.1, .5, 3300, 2, 3),
                    (3.2, .4, 1680, -200, -5), (3.64, 0.42, 2000, -100, 8), (4, 0.56, 2700, 2, 3),
                    (3.3, 1.7, 4170, 0, 7), (4.54, 0.49, 4600, 0, 12.5), (3.3, .5, 4700, 0, -6),
                    (2.1, .4, 3600, 0, 6), (5.0, .6, 1800, -100, 3), (6.2, .6, 2480, 100, 5.5),
                    (5.6, .5, 3210, 0, 6), (7.2, 1.2, 2320, 0, -7), (4.9, 0.57, 2840, 0, -5),
                    (6.4, .35, 2500, 0, -5), (7.2, 1, 2480, -1, 3.5), (9.0, .15, 1830, 0, 4),
                    (9.4, .8, 3700, 0, 11.5), (7.6, 1.0, 1800, -2, -2.5), (8.5, .8, 4170, 0, 2),
                    (8.6, 0.63, 1900, 77, 6), (9.05, .35, 2120, -150, 5.5), (9.2, .7, 3700, 1, -5)]
    cycle = engine_cycle()
    rough = volts_from_db(-1.28) * exhaust(cycle) + engine_room(cycle)
    engine = swelling(rough + chugs(cycle), low_swells, width_hz=12.2)
    air = whistle() + compressor() + blow_off()
    body = swelling(engine, middle_swells, width_hz=28) + air
    return turning(swelling(body, upper_swells, width_hz=70) + clinks() + leaks())


def drop_patches(x, masking_db):
    # frequency in Hz, share dropped from 0 to 1.
    dropped_share = [(2500, .002), (4200, .04), (6000, .23), (9000, .33), (11000, .42), (14000, .5)]
    frame = dict(fs=SR, window="cosine", nperseg=2048)
    lead = 330
    hz, _, cells = signal.stft(np.pad(x, ((0, 0), (lead, 0))), **frame)
    power = uniform_filter1d(np.sum(np.abs(cells) ** 2, axis=0), size=5, axis=1) + 1e-20
    nearby, around = [uniform_filter1d(power, size=bins, axis=0) for bins in (14, 122)]
    stand_out_db = 10 * np.log10(nearby / around)
    share = np.clip(np.interp(hz, *np.transpose(dropped_share), left=0), 1e-6, .95)[:, None]
    chance = 1.5 * patches(cells.shape[1:], bins=8, frames=4)
    margin = chance - np.log(share / (1 - share)) + stand_out_db / masking_db
    return signal.istft(cells * (margin > 0), **frame)[1][:, lead:N + lead]


def top_cut(x):
    return signal.sosfilt(signal.butter(12, 15700, fs=SR, output="sos"), x)


def record(dry):
    over_db = np.maximum(20 * np.log10(np.abs(dry).max(axis=0) + 1e-9) - 3.2, 0)
    release_db = 60.0 * TIME
    held_db = np.maximum.accumulate(over_db + release_db) - release_db
    r = np.exp(-1 / (0.0034 * SR))
    ducked = dry * volts_from_db(-.7 * signal.lfilter([1 - r], [1, -r], held_db))
    thinned = drop_patches(np.clip(ducked, -1, 1), masking_db=7.0)
    return top_cut(np.clip(thinned, -1, 1))


dry = scene()
out = record(dry)
wrap_up_sound(out)
```